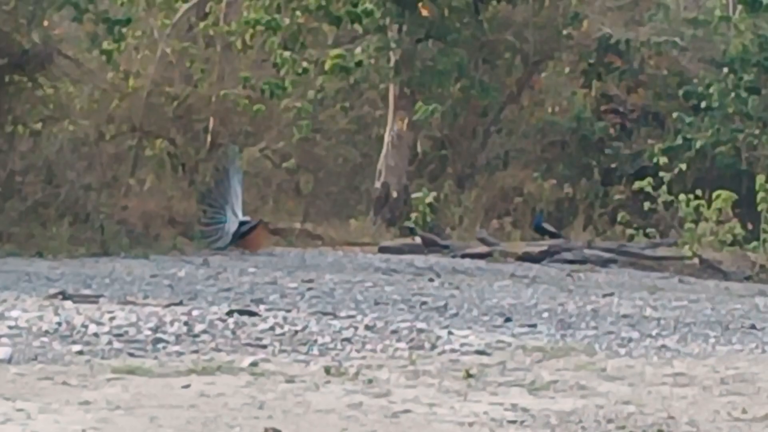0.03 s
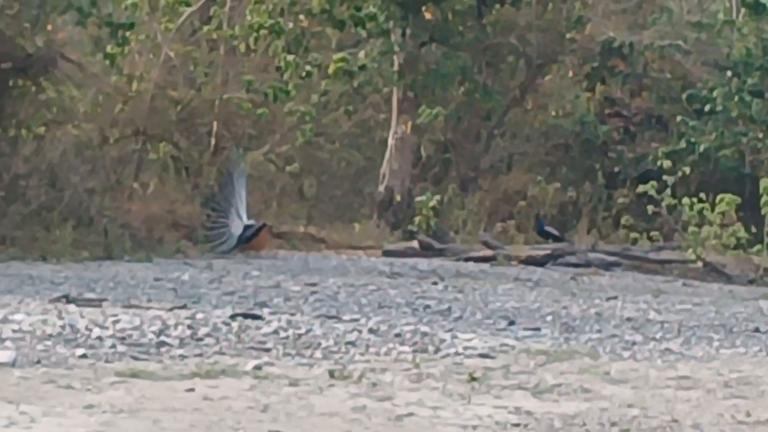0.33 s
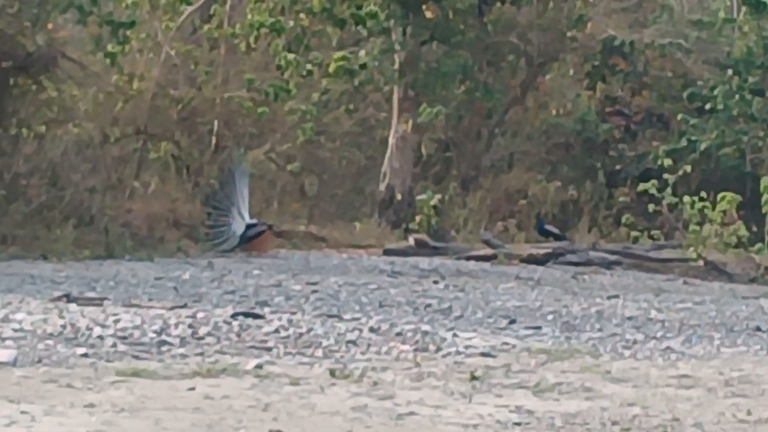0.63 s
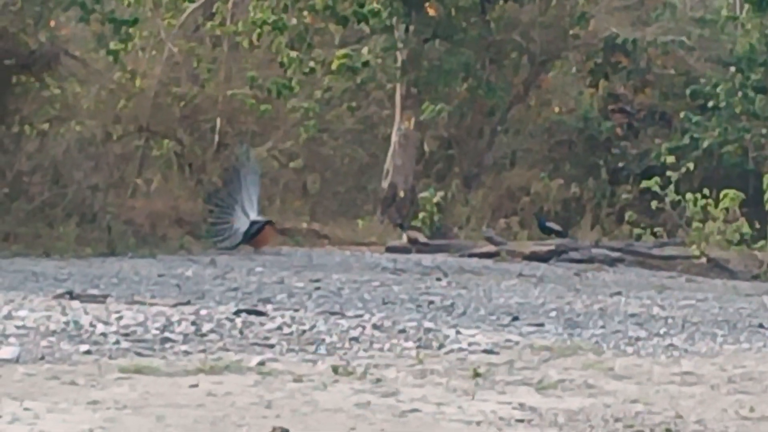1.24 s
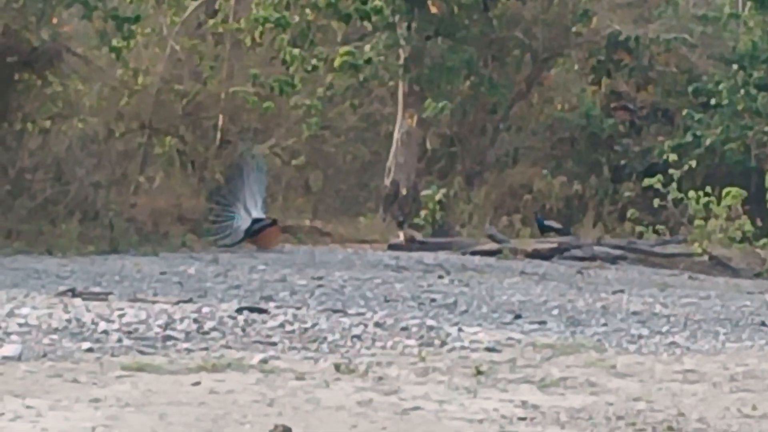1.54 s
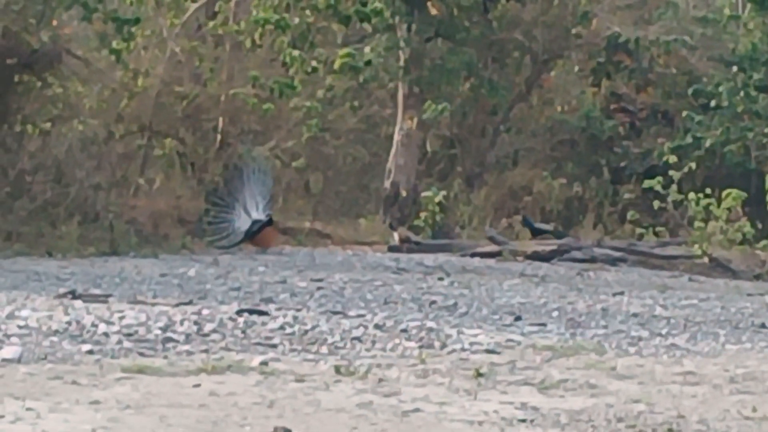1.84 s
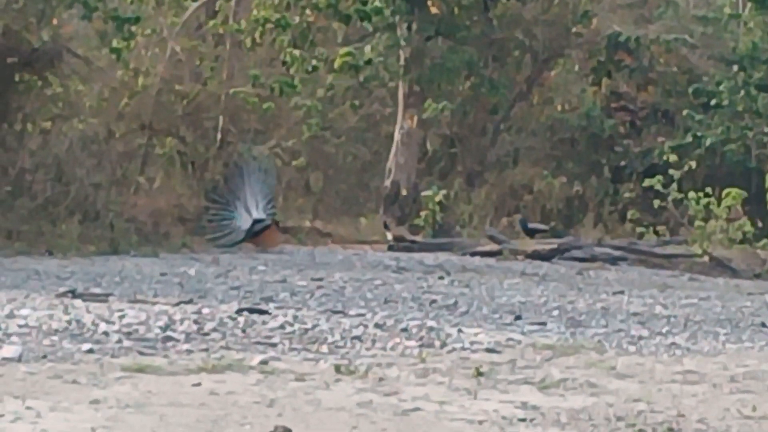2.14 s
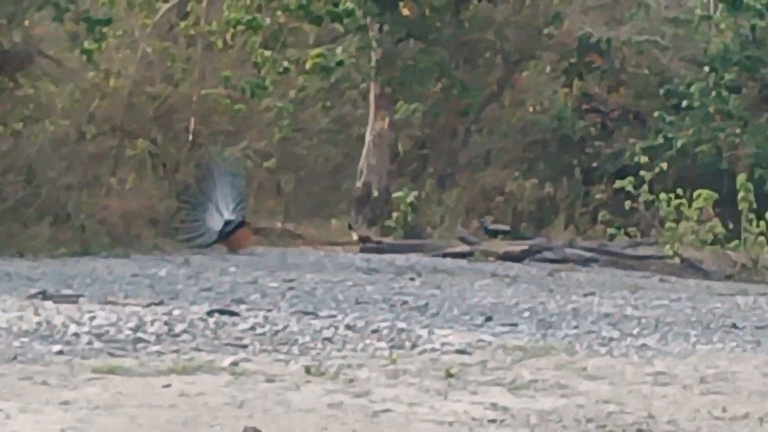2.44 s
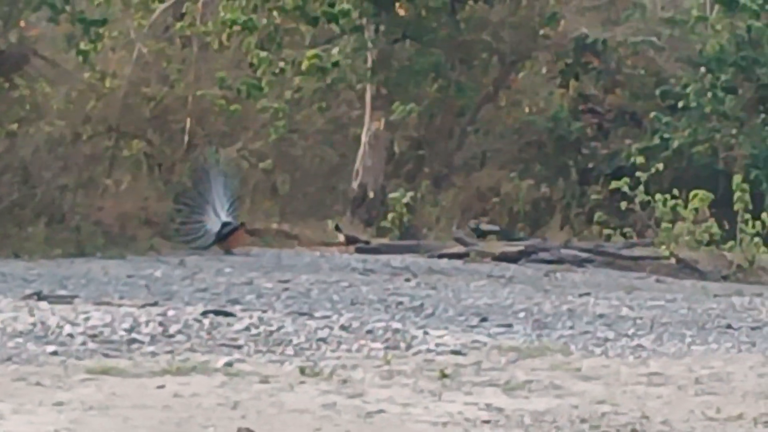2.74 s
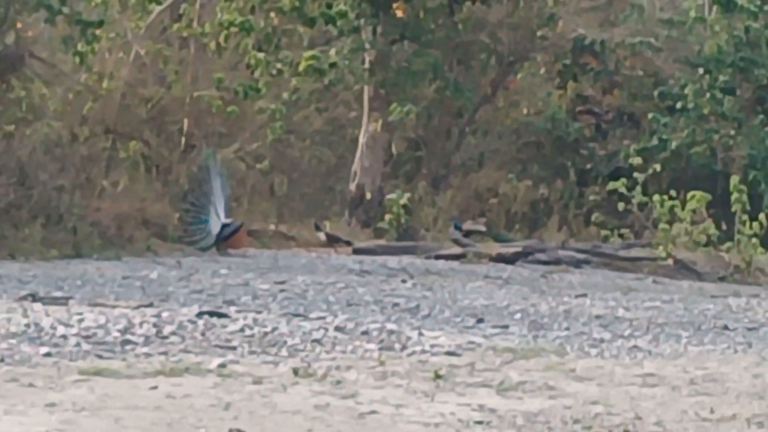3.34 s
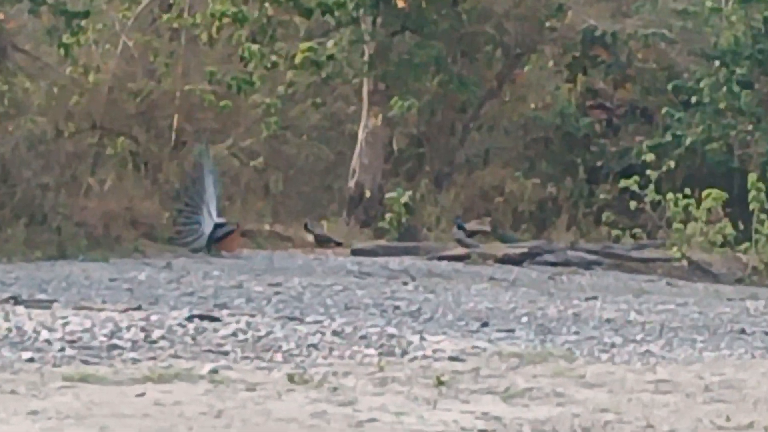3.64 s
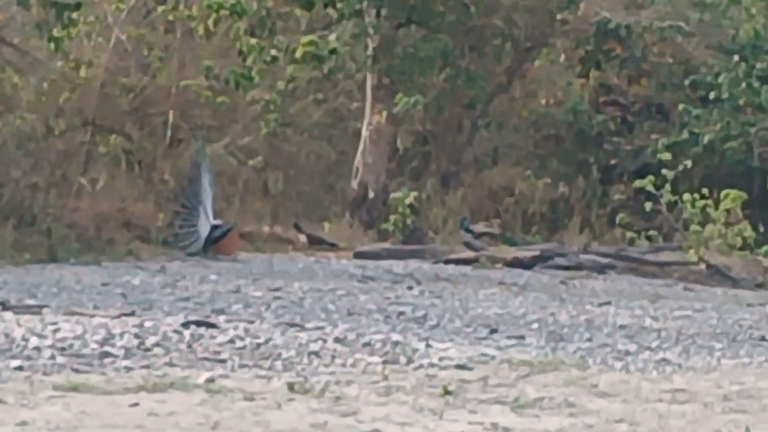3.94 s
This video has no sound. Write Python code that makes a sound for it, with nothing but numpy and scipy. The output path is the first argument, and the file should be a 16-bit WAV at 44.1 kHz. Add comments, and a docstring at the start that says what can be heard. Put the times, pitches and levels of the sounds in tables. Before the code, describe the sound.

A diesel engine idles at a forest edge with a low chugging drone and metallic clatter. A dull thump sounds close by, something brushes the microphone on the right, then a bird gives two rising whistles over soft hiss.

```python
"""At the edge of a forest, a three-cylinder diesel engine idles at about 23 firings a second.
Its exhaust booms and chuffs, its body drones, and the firings make the metal clatter and ring.
A dull thump sounds close by, something rustles and brushes against the right microphone,
and a bird gives two rising whistles with a short echo. Behind it all lies a soft outdoor hiss,
with a faint shimmer, ticks, peeps and far-off tones."""
import sys
import numpy as np
from scipy import signal
from scipy.fft import rfft, irfft
from scipy.io import wavfile

SR = 44100
rng = np.random.default_rng(int(sys.argv[2]) if len(sys.argv) > 2 else 0)


def bounce(signal):
    """Save signal as a 16-bit WAV file at the path given by the first command-line argument."""
    frames = np.transpose(np.atleast_2d(signal))
    limited = np.clip(frames, -1, 1)
    pcm = np.round(limited * 32767).astype(np.int16)
    wavfile.write(sys.argv[1], SR, pcm)


N = 176400
T = np.arange(N) / SR
HZ = np.fft.rfftfreq(N, 1 / SR)


def amp(db):
    """Turn decibels into a gain."""
    return 10 ** (np.asarray(db) / 20)


def curve(table, column=1):
    """Join the points of a time table: one value for every sample."""
    rows = np.array(table)
    return np.interp(T, rows[:, 0], rows[:, column])


def spectrum(table, column=1):
    """Join the points of a frequency table: one value for every frequency."""
    rows = np.array(table)
    return np.interp(np.log(HZ + 1), np.log(rows[:, 0]), rows[:, column])


def wander(hz):
    """A random wobble of size one; a higher hz makes it quicker."""
    a, b = rng.standard_normal((2, 4000))
    x = irfft((a + 1j * b) * np.exp(-(HZ[:len(a)] / hz) ** 2), N)
    return (x - x.mean()) / x.std()


def ripple(width_hz):
    """Random bumps and dips along frequency, like many narrow resonances."""
    knots = np.arange(0, SR / 2 + width_hz, width_hz)
    return np.interp(HZ, knots, rng.standard_normal(len(knots)))


def resonances(table, width_hz):
    """Narrow peaks that lift chosen pitches, in dB."""
    return sum(db * np.exp(-((HZ - hz) / width_hz) ** 2) for hz, db in table)


# How alike left and right are: f/Hz, likeness (1 = the same)
LIKENESS = [(30, 0.71), (60, 0.68), (150, 0.96), (300, 0.66), (600, 0.58), (1200, 0.0016), (16000, 0)]
def noise(density_db):
    """Stereo noise shaped by a level in dB per Hz, alike in both ears in the bass."""
    a, b = rfft(rng.standard_normal((2, N)))
    same = spectrum(LIKENESS)
    mid, side = a * np.sqrt((1 + same) / 2), b * np.sqrt((1 - same) / 2)
    return irfft(np.array([mid + side, mid - side]) * amp(density_db), N) * np.sqrt(SR / 2)


def swell(start, rise, hold, decay):
    """A level that rises, holds and dies away (times in seconds)."""
    return np.clip((T - start) / rise, 0, 1) * np.exp(-np.maximum(T - start - rise - hold, 0) / decay)


def burst(start, db, hz, octaves, decay, rise=.0013):
    """A short burst of noise around one pitch."""
    band = noise(-10 * np.log10(1 + (np.log2((HZ + 1) / hz) / octaves) ** 6))
    return amp(db) * band / band.std() * swell(start, rise, 0, decay)


# Engine speed: t/s, firing rate/Hz
SPEED = [(0, 23.01), (1.75, 23.01), (2.35, 22.64), (2.86, 22.95), (3.12, 23.03), (3.42, 23.53),
         (3.87, 23.02)]
def engine():
    """One speed drives the engine's sounds; the count of firings goes up by one at each firing."""
    firings = np.cumsum(curve(SPEED)) / SR
    firings -= np.interp(.1117, T, firings)  # a firing falls at this time
    tones = np.sqrt(2) * (exhaust_boom(firings) + body_drone(firings)) * amp([[-.9], [.9]])
    return tones + chuff(firings) + clatter(firings) + metal_ring(firings)


# Exhaust tones: t/s, then level/dB at 1, 2 and 3 times the firing rate
BOOM = [(.3, -33.5, -35, -41), (.64, -33, -33, -39), (.99, -33.5, -36, -41), (1.2, -31, -31.5, -37.5),
        (1.8, -31.5, -32, -39.5), (2.05, -31.5, -33.5, -38.5), (2.4, -33, -35, -38), (4, -32.5, -33.5, -38)]
def exhaust_boom(firings):
    """Exhaust pulses make three low tones, each shifted in time by the pipe's resonance."""
    pipe_hz, pipe_q, lead_firings = 65.5, 4.5, .18
    out = 0
    for k in (1, 2, 3):
        ratio = k * curve(SPEED) / pipe_hz
        pipe_lag = np.arctan(pipe_q * (ratio - 1 / ratio))
        out += amp(curve(BOOM, k)) * np.cos(2 * np.pi * k * (firings + lead_firings) - pipe_lag)
    return out


# Tones of the engine body: multiple of the full cycle rate (a cycle is three firings), level/dB
DRONE = [(11, -61.5), (12, -53.5), (13, -64.5), (15, -59.5), (18, -60), (21, -57.5), (22, -63), (23, -60.5),
         (24, -56), (25, -62.5), (26, -60), (28, -62), (29, -58), (30, -57.5), (32, -62), (33, -61.5),
         (39, -62), (42, -69), (45, -66.5), (47, -68), (48, -65.5), (50, -69), (51, -64.5), (72, -65.5),
         (91, -69.5), (111, -69.5)]
# Rise and fall of the drone: t/s, level/dB
DRONE_LEVEL = [(0, -1), (.7, 1.5), (1.3, 2), (1.8, 1), (2.2, -1), (3.1, -0.6), (4, -2)]
def body_drone(firings):
    """The body hums with a limp: one cylinder leads the low tones, another the high ones."""
    cylinders, whine_db = 3, -61
    out, lag, previous = 0, 0, 0
    for multiple, db in DRONE:
        k = multiple / cylinders  # vibrations per firing
        cylinder = 2 if k < 13.5 else 0
        lag += (k - previous) * rng.uniform(.151, .5187)  # swells in this part of a firing
        previous = k
        waver = 1 + .17 * (wander(hz=5.3) + 1j * wander(hz=3.9))  # in level and phase
        cycles = k * (firings - cylinder) - lag + .13 * rng.standard_normal()
        out += amp(db) * (waver * np.exp(2j * np.pi * cycles)).real
    whine = amp(whine_db) * np.sin(2 * np.pi * 19.5 * firings + .5 * wander(hz=4.5))
    return (out + whine) * amp(curve(DRONE_LEVEL))


# Noise of the firings: f/Hz, level/dB per Hz
CHUFF = [(20, -62.5), (70, -66.5), (120, -76.5), (220, -70.5), (300, -79.5), (400, -81), (600, -86.5),
         (780, -78.5), (1000, -93), (1400, -90.5), (2400, -97.5), (3800, -100.5), (5500, -116),
         (16000, -135)]
def chuff(firings):
    """A puff of noise swells once in every firing."""
    puff_db = 2.5 * (np.cos(2 * np.pi * (firings - .31)) - 1)
    colour = spectrum(CHUFF) + 1.67 * ripple(width_hz=45)
    return noise(colour) * amp(.5 * curve(DRONE_LEVEL) + puff_db)


# Noise of the tapped engine block: f/Hz, level/dB per Hz
CLATTER = [(300, -110), (750, -90.5), (1100, -93.5), (1400, -92), (1580, -86), (1720, -83.5), (1900, -104),
           (2400, -99), (3500, -103), (7000, -125)]
# Taps in one firing: t/s from the firing, level/dB
CLATTER_TAPS = [(-.0015, -1), (.0045, -1.5), (.02, -5)]
# Rise and fall of the clatter: t/s, level/dB
CLATTER_LEVEL = [(0, -1), (1.2, -1), (2.25, 2), (2.45, 3), (3.05, 3.5), (3.4, -6.5), (3.7, -1.5), (4, 1)]
def clatter(firings):
    """Each firing taps the engine block three times, and each tap dies away fast."""
    decay_s = .0066
    firing_times = T[1:][np.diff(np.floor(firings)) > 0]
    taps = np.zeros(N)
    for delay, db in CLATTER_TAPS:
        at = np.clip(((firing_times + delay) * SR).astype(int), 0, N - 1)
        taps[at] += amp(db + rng.standard_normal(len(at)))
    tails = signal.lfilter([1], [1, -np.exp(-1 / (decay_s * SR))], taps)
    level = tails / np.sqrt(np.mean(tails ** 2)) * amp(curve(CLATTER_LEVEL))
    return noise(spectrum(CLATTER) + 1.2 * ripple(width_hz=70)) * level * amp([[1], [-1.2]])


# Thin metal ring: t/s, level/dB
RING_LEVEL = [(0, -62.5), (.65, -60), (.9, -69), (2, -66), (3.2, -67.5), (4, -75)]
def metal_ring(firings, hz=1702):
    """A thin engine part rings, pushed again by each firing."""
    pulse = 1 + .58 * np.cos(2 * np.pi * (firings - .1))
    tones = np.array([np.sin(2 * np.pi * hz * T + .88 * wander(hz=25)) for _ in range(2)])
    return amp(curve(RING_LEVEL)) * pulse * tones


# Outdoor hiss: f/Hz, left level/dB per Hz, right level/dB per Hz
AIR = [(20, -66, -70), (212, -75.5, -74), (506, -82.5, -88), (835, -86.5, -85.5), (1140, -87, -86),
       (1700, -90.5, -100), (2210, -92, -91), (2940, -97.5, -98), (3660, -93, -96.5), (4340, -101, -103),
       (5170, -103, -103), (6630, -109, -99), (7080, -111, -107), (7900, -105, -126), (9940, -111, -119),
       (11340, -105, -117), (12400, -112, -115), (15400, -115, -112)]
# Rise and fall of the hiss: t/s, level/dB
AIR_LEVEL = [(0, -0.5), (.55, 1.5), (.9, 1), (1.25, 1.5), (2.1, -0.5), (3, 1), (4, 0)]
def air():
    """A soft, even outdoor hiss."""
    colour = np.array([spectrum(AIR, 1), spectrum(AIR, 2)]) + 1.4 * ripple(width_hz=80)
    return noise(colour) * amp(curve(AIR_LEVEL) + .48 * wander(hz=13))


def strokes(colour, table, treble_hz=7600):
    """One swell of rubbing noise for each row, with its own level and treble."""
    return sum(noise(colour + db + treble_db * (HZ > treble_hz)) * swell(*timing)
               for *timing, db, treble_db in table)


# Each rustle: t/s, rise/s, hold/s, decay/s, level/dB, treble/dB
RUSTLES = [(0.17, 0.13, 0.42, 0.036, -5.5, -11), (.83, .04, .04, .04, -11, -3),
           (1.114, 0.014, 0.013, 0.027, -5, -9), (2.924, 0.027, 0.096, 0.12, -5.5, -2),
           (3.093, 0.1, 0.1, .19, 4, -3)]
# Rustling noise: f/Hz, level/dB per Hz
RUSTLE_COLOUR = [(1500, -120), (3500, -100), (4800, -97.5), (5500, -93), (6100, -93), (6800, -91),
                 (7350, -106), (8200, -120), (9500, -110), (12000, -111), (15500, -111)]
# Thin ringing in the rustle: f/Hz, lift/dB
RUSTLE_PEAKS = [(5620, 5), (5740, 11), (5935, 5), (6080, 7), (6240, 12), (6590, 9.5), (6710, 4),
                (6820, 8.5)]
def rustles():
    """Faint, fluttering rustles at the right microphone."""
    colour = spectrum(RUSTLE_COLOUR) + resonances(RUSTLE_PEAKS, width_hz=31) + 1.5 * ripple(width_hz=100)
    return strokes(colour, RUSTLES) * amp(2 * wander(hz=60)) * amp([[-22], [0]])


# High hiss: f/Hz, level/dB per Hz
SHIMMER = [(3500, -125), (5500, -107), (7000, -111), (8500, -111), (11000, -112), (13000, -123)]
# Tinkling pitches: f/Hz, lift/dB
SHIMMER_PEAKS = [(5070, 11), (6300, 16), (8100, 11), (8860, 9), (9080, 12), (10890, 8), (11220, 8)]
def shimmer():
    """A thin, tinkling hiss on the left, early on."""
    colour = spectrum(SHIMMER) + resonances(SHIMMER_PEAKS, width_hz=50) + 2.5 * ripple(width_hz=100)
    level = amp(2.5 * wander(hz=18)) * swell(start=.22, rise=.16, hold=.27, decay=.05)
    return noise(colour) * level * [[1], [0]]


# Bird peeps: t/s, level/dB, f/Hz
PEEPS = [(.815, -66, 4500), (.85, -65, 4680), (3.54, -61.5, 5940)]
def peeps():
    """A bird peeps faintly, far away."""
    return sum(burst(*row, octaves=.02, decay=.018, rise=.015) for row in PEEPS)


def forest_echo(call, echo_db=-8.5, t60_s=.28):
    """The forest adds a short echo to a call; it falls 60 dB in t60_s."""
    tail = rng.standard_normal((2, SR)) * amp(-60 * T[:SR] / t60_s)
    tail /= np.linalg.norm(tail[0])
    return call + amp(echo_db) * signal.fftconvolve(call, tail, axes=1)[:, :N]


# Tones of the thump: f/Hz, level/dB, time to fall 60 dB/s, delay/s
THUMP_TONES = [(122, -20, .12, 0.0058), (187, -23.5, 0.084, 0.002), (244.6, -18, 0.063, 0.00162)]
def thump(start_s=1.0705, rise_s=.0028):
    """A soft blow sets three low tones ringing, and a brief rub follows."""
    out = np.zeros(N)
    for hz, db, t60, delay in THUMP_TONES:
        age = np.maximum(T - start_s - delay, 0)
        out += amp(db - 60 * age / t60) * np.minimum(age / rise_s, 1) * np.sin(2 * np.pi * hz * age)
    rub = burst(start=1.1, db=-41, hz=222, octaves=.3, decay=.17, rise=.01)
    return out * amp([[-.6], [.6]]) + rub


# Small ticks: t/s, level/dB, f/Hz, width/octaves
TICKS = [(2.951, -49, 3500, .2), (1.128, -56, 4600, .05)]
def ticks():
    """Two small, high ticks, louder on the right."""
    return sum(burst(*row, decay=.015) for row in TICKS) * amp([[-6], [0]])


# Each brush: t/s, rise/s, hold/s, decay/s, level/dB, treble/dB
BRUSHES = [(2.329, 0.008, 0.007, 0.024, -2, 5), (2.349, 0.0084, 0.0069, 0.021, 0.5, -9),
           (2.297, 0.083, .02, 0.1, -18.5, 6)]
# Brushing noise: f/Hz, level/dB per Hz
BRUSH_COLOUR = [(300, -77), (1000, -77.5), (2200, -75), (3200, -79.5), (4500, -77), (5500, -73),
                (6400, -65), (7000, -73), (7700, -82.5), (8500, -102), (9700, -87), (11500, -91.5),
                (14000, -89), (15500, -82)]
# Ringing under the brushes: f/Hz, level/dB per Hz
BRUSH_RING = [(5000, -125), (6100, -100), (6600, -94), (7100, -95), (7600, -99), (8300, -122)]
def brushes():
    """Something brushes the right microphone, and the grainy rubbing keeps a high ring going."""
    rubbing = strokes(spectrum(BRUSH_COLOUR) + 2 * ripple(width_hz=90), BRUSHES)
    ring = noise(spectrum(BRUSH_RING) + 3.5 * ripple(width_hz=60))
    ring *= swell(start=2.312, rise=.023, hold=.24, decay=.05)
    grain = amp(1.2 * wander(hz=250))
    return (rubbing + ring) * grain * amp([[-38], [0]])


# Engine knocks: t/s, level/dB, f/Hz
KNOCKS = [(2.466, -50, 1580), (2.511, -51.5, 1650), (2.554, -46, 1580), (2.597, -42, 1540),
          (2.731, -48, 1050), (2.86, -54, 1470), (2.99, -45.5, 1550), (3.081, -46, 1300),
          (3.893, -53, 1520), (3.938, -52, 1560)]
def knocks():
    """Now and then the fuel burns with a harder bang, and the engine knocks."""
    return sum(burst(*row, octaves=.19, decay=.014) for row in KNOCKS)


# Each whistle: a list of points (t/s, f/Hz, level/dB), then left minus right/dB
WHISTLES = [([(2.775, 4520, -80), (2.802, 4830, -61.5), (2.819, 4950, -77), (2.83, 5090, -65),
            (2.854, 5230, -63), (2.865, 5300, -76), (2.883, 5490, -55.5), (2.906, 5560, -73)], -6),
            ([(3.118, 3860, -66), (3.138, 4070, -47), (3.16, 4350, -53), (3.178, 4500, -59),
            (3.203, 4700, -44), (3.22, 4800, -44.5), (3.243, 4960, -56), (3.262, 5040, -66)], 2)]
def whistles():
    """A bird whistles two pure notes, each swelling a few times as it rises."""
    out = 0
    for points, pan_db in WHISTLES:
        hz = curve(points, 1) * (1 + .005 * wander(hz=120))
        start, end = points[0][0], points[-1][0]
        sounding = np.clip(np.minimum(T - start, end - T) / .003, 0, 1)
        level = amp(curve(points, 2) + 1.5 * wander(hz=70)) * sounding
        tone = np.sqrt(2) * np.sin(2 * np.pi * np.cumsum(hz) / SR)
        out += level * tone * amp([[pan_db / 2], [-pan_db / 2]])
    return out


# Far-off tones: t/s, level/dB, f/Hz
FAR_TONES = [(3.37, -59, 1190), (3.88, -54, 1525)]
def far_tones():
    """Two soft tones barely rise out of the background."""
    return sum(burst(*row, octaves=.023, decay=.071, rise=.057) for row in FAR_TONES)


def scene():
    """Add up the engine, the background, the close noises and the bird."""
    diesel = engine() + knocks()
    background = air() + shimmer() + far_tones()
    close = rustles() + thump() + ticks() + brushes()
    return diesel + background + close + forest_echo(peeps() + whistles())


# Opening fade: t/s, level/dB
FADE_IN = [(.078, -18), (.11, -10.5), (.16, -7.5), (.24, -3), (.33, -0.5)]
def record(dry, start_s=.077, cutoff_hz=15750):
    """Fade in after a moment of silence and cut the very highest treble."""
    faded = dry * amp(curve(FADE_IN)) * np.clip((T - start_s) / .0022, 0, 1)
    lowpass = signal.firwin(511, cutoff_hz, window=("kaiser", 9), fs=SR)
    return signal.oaconvolve(faded, lowpass[None], "same")


dry = scene()
out = record(dry)
bounce(out)
```